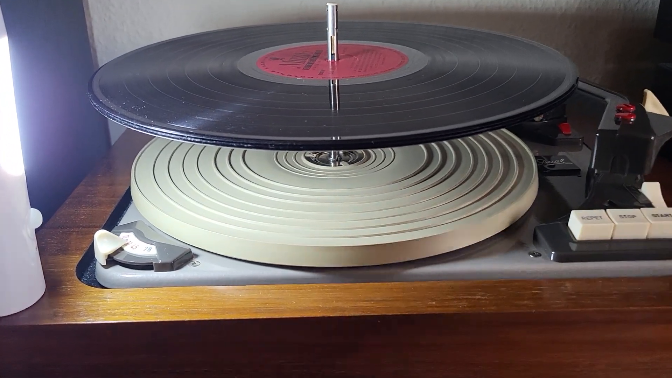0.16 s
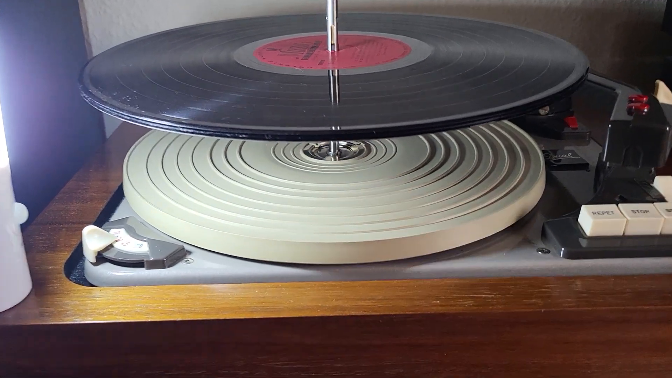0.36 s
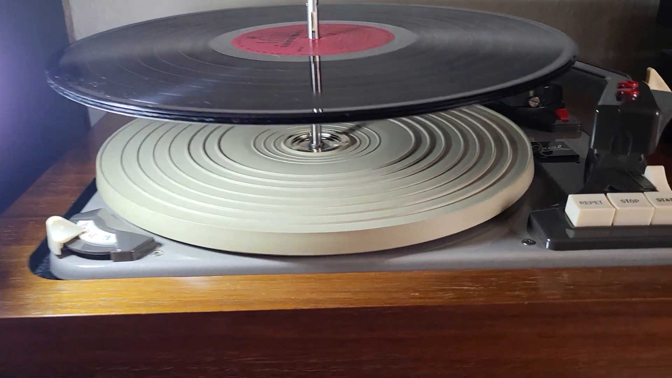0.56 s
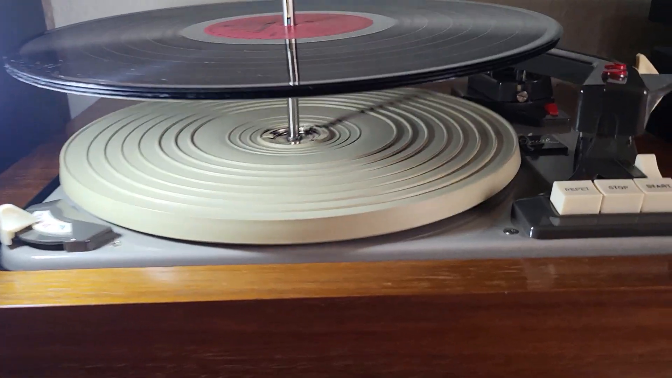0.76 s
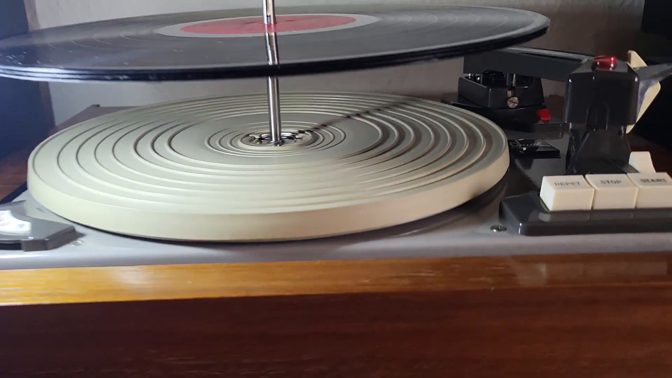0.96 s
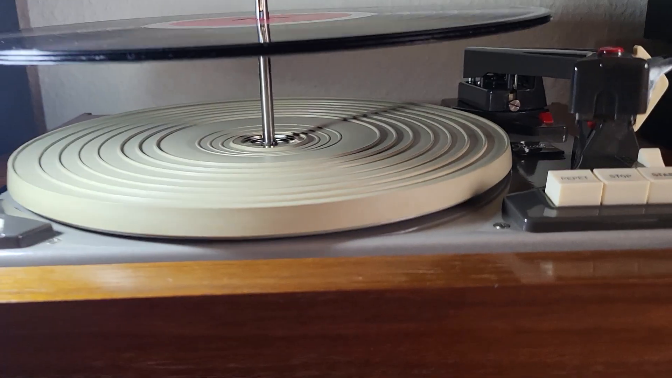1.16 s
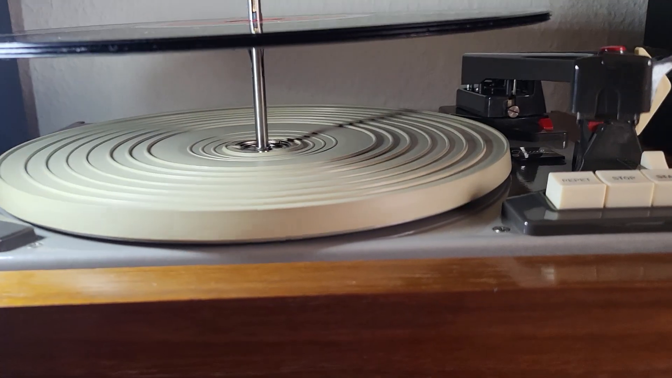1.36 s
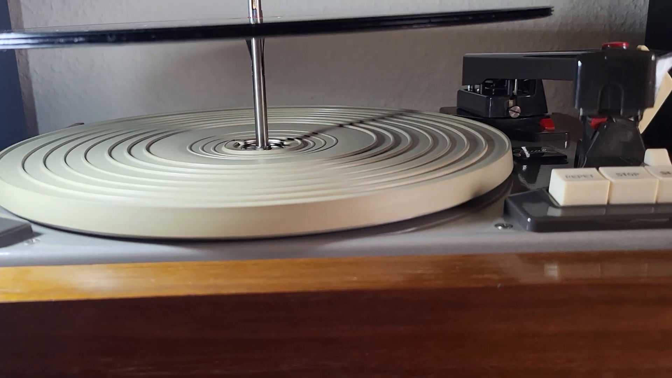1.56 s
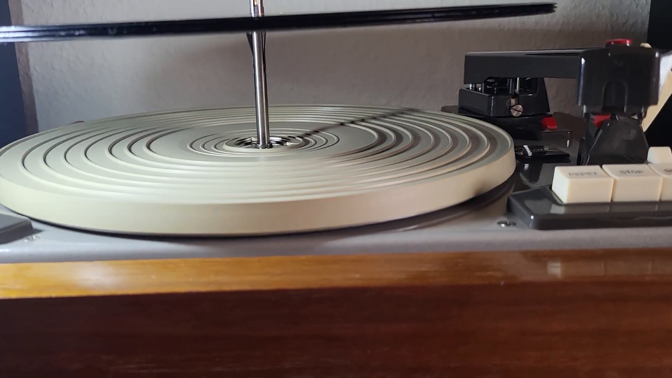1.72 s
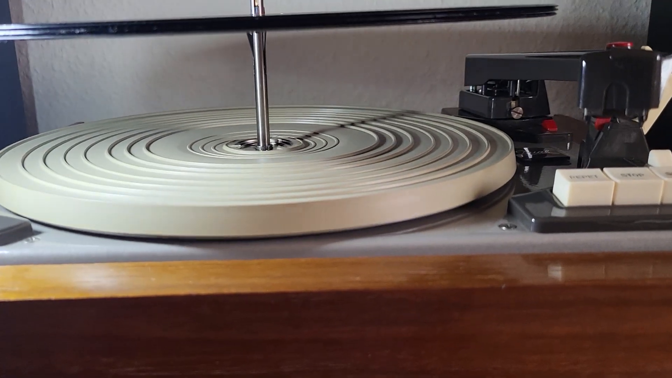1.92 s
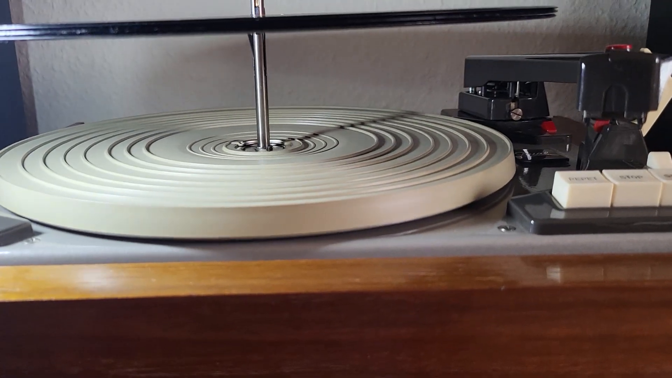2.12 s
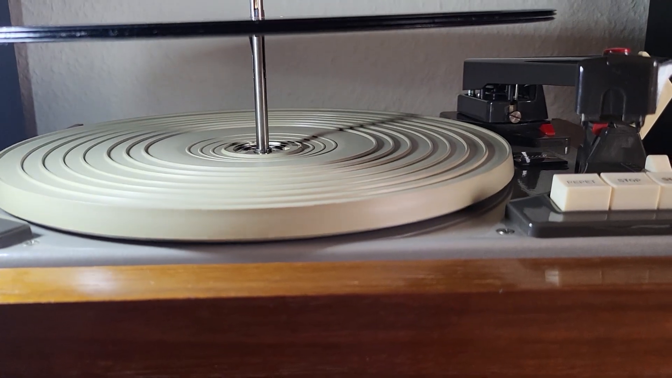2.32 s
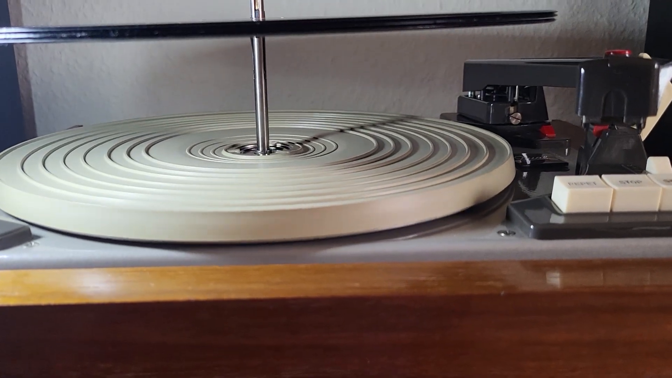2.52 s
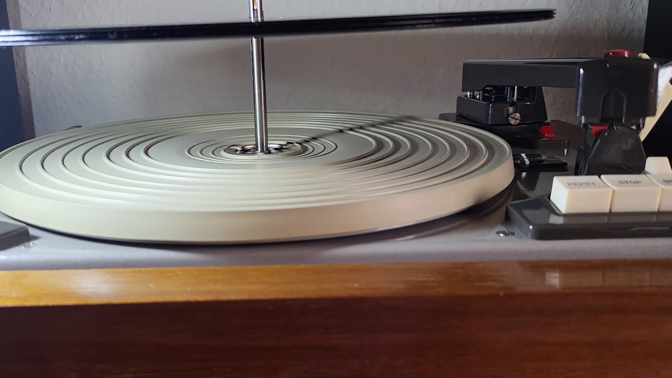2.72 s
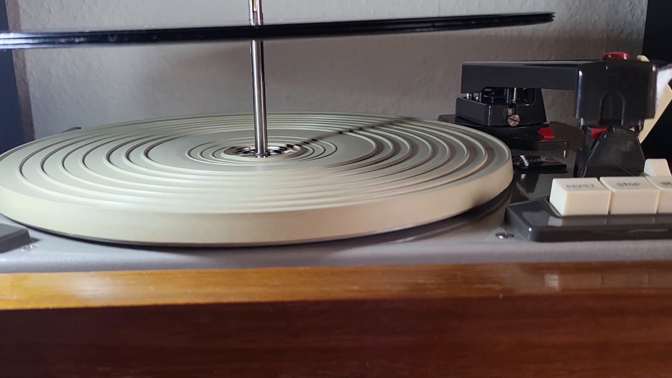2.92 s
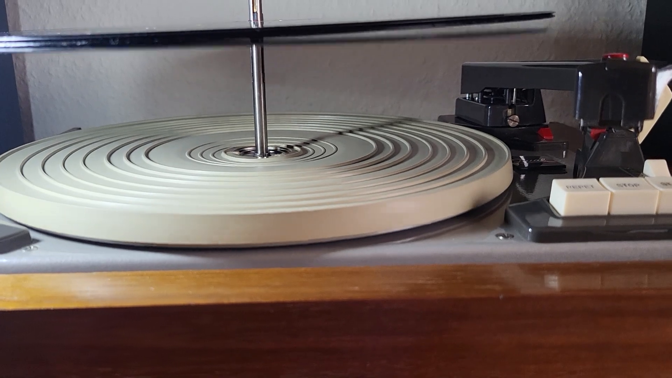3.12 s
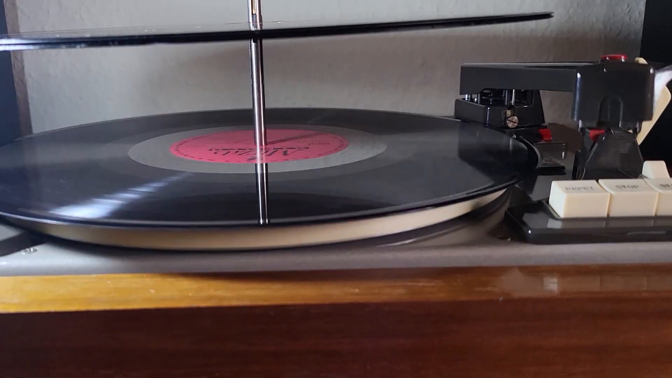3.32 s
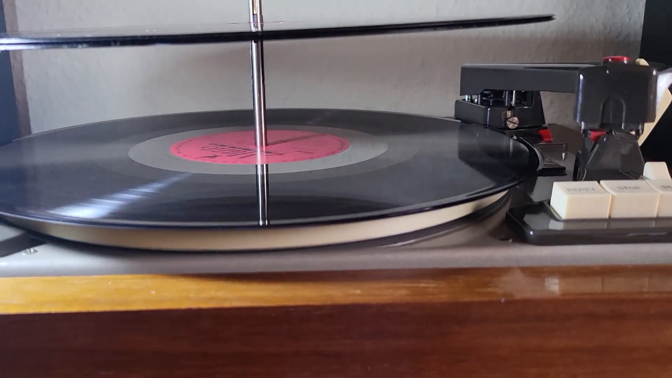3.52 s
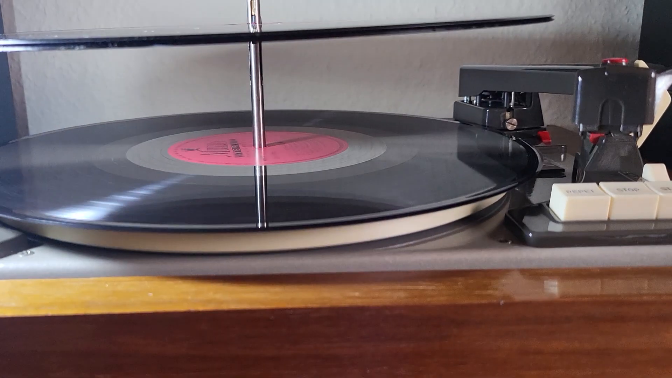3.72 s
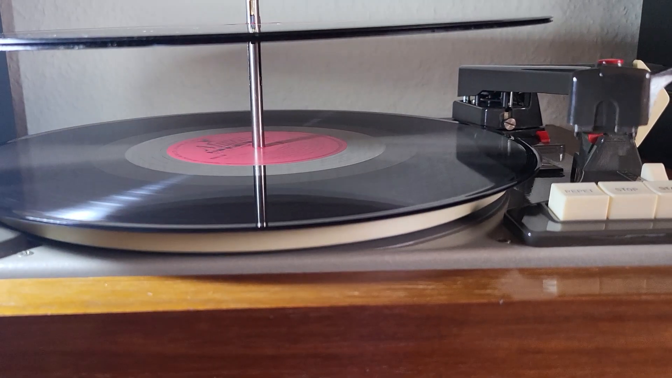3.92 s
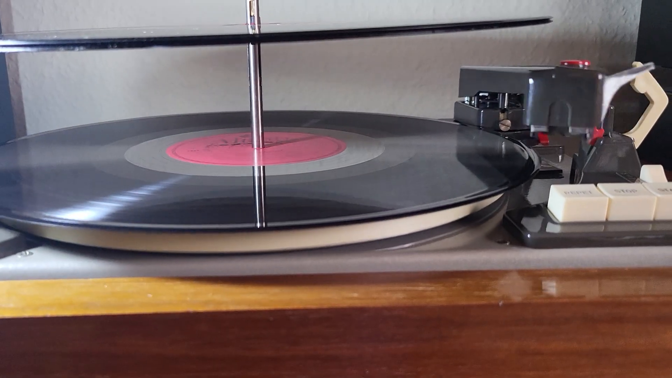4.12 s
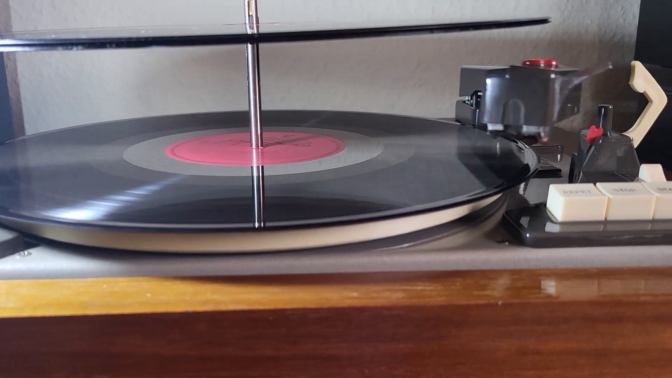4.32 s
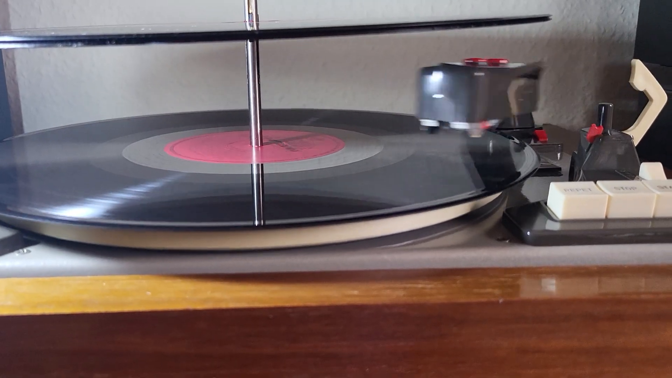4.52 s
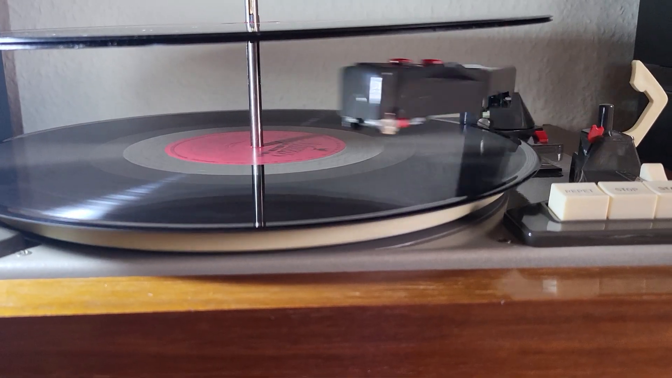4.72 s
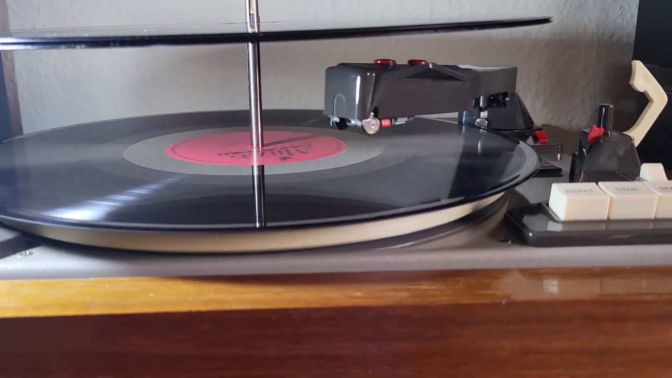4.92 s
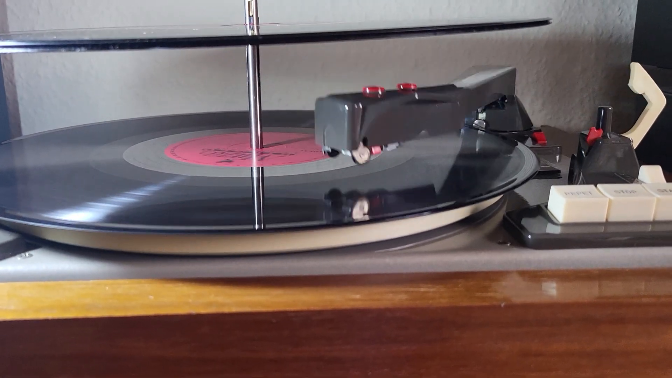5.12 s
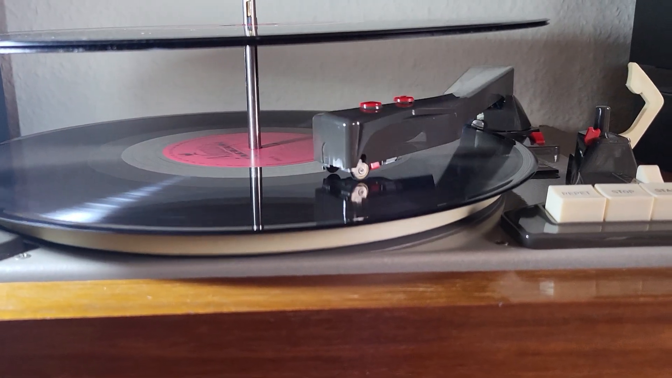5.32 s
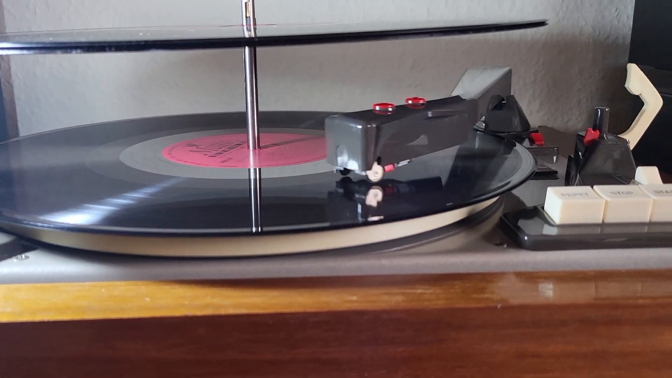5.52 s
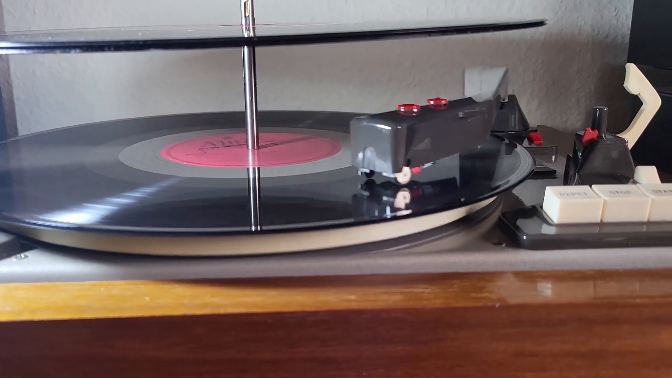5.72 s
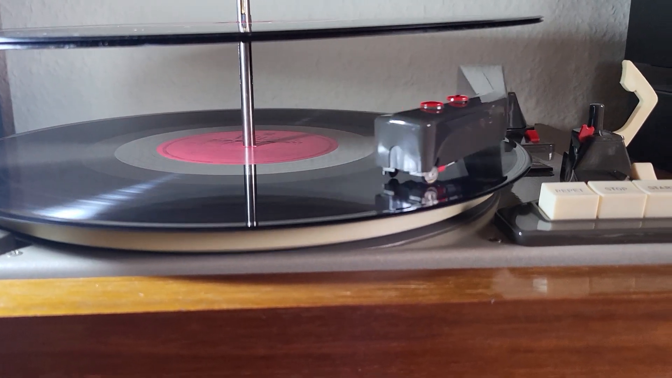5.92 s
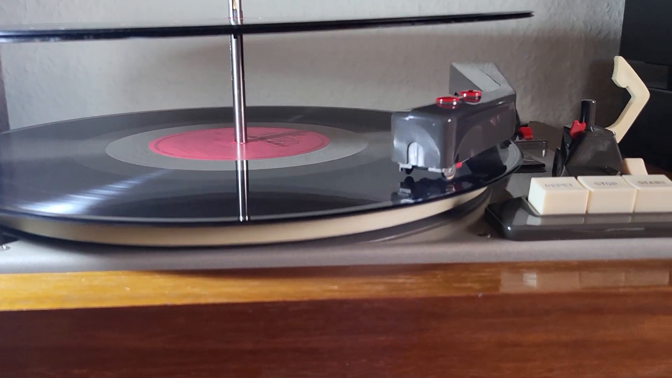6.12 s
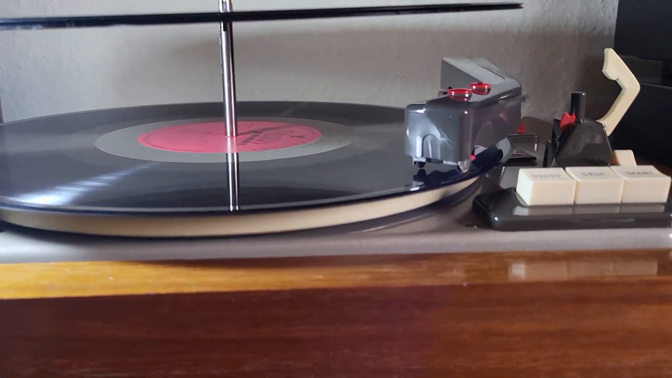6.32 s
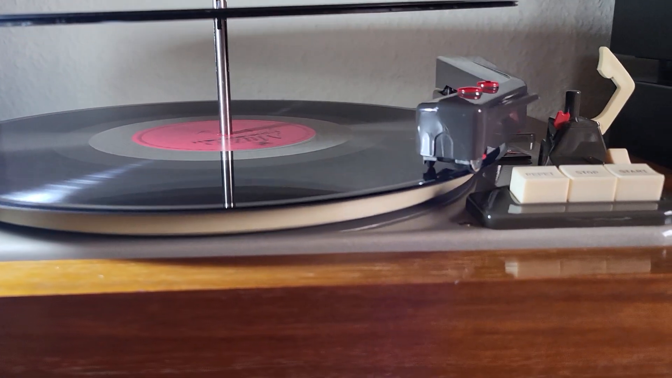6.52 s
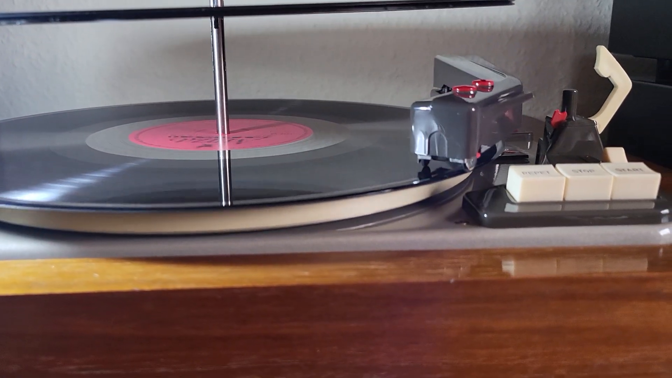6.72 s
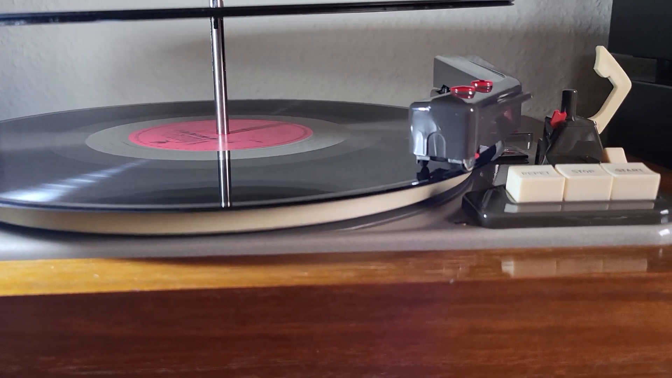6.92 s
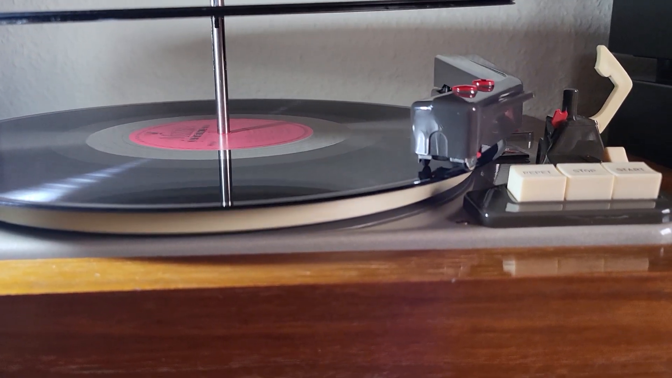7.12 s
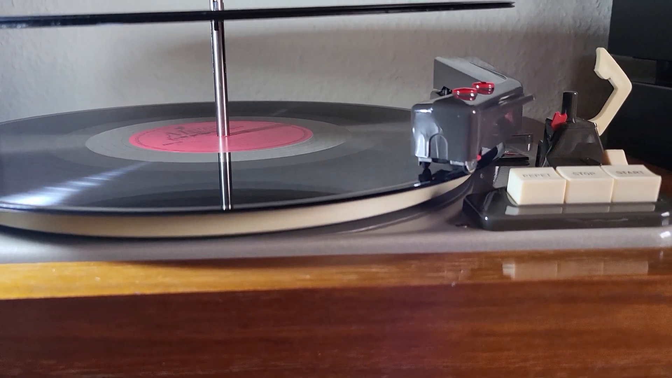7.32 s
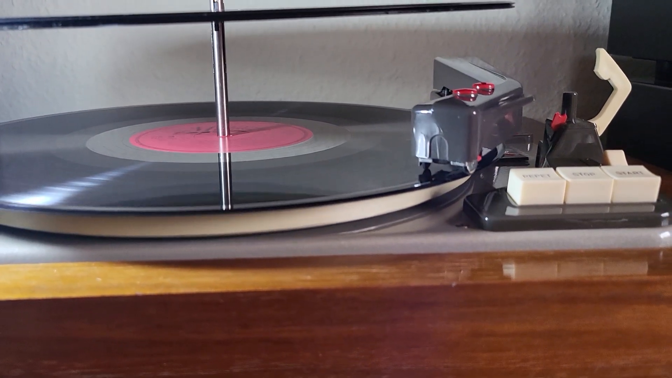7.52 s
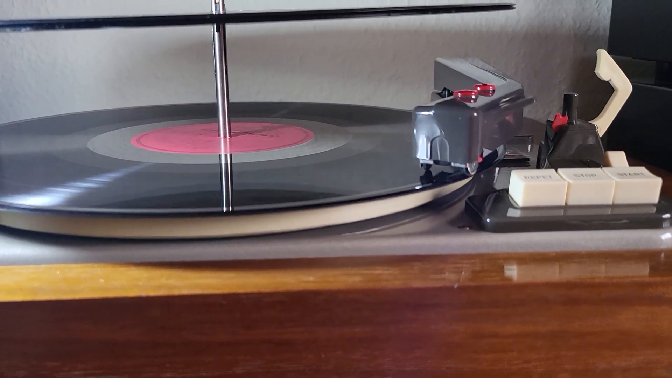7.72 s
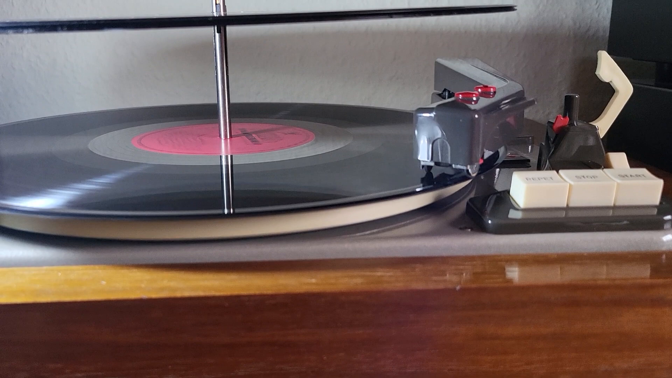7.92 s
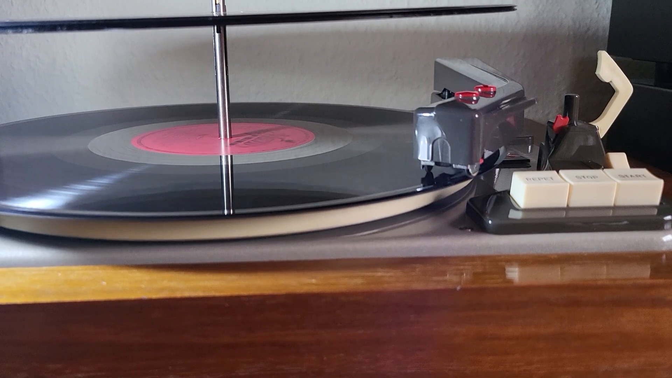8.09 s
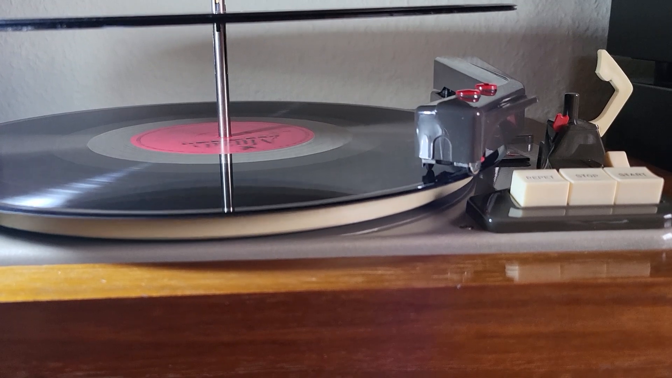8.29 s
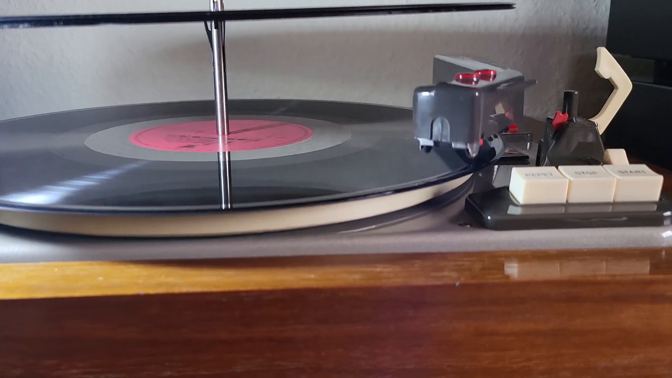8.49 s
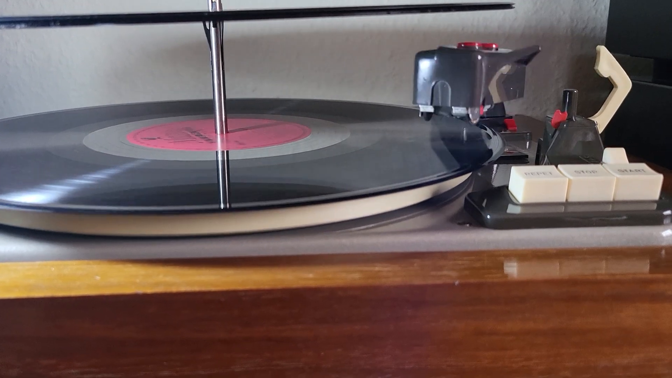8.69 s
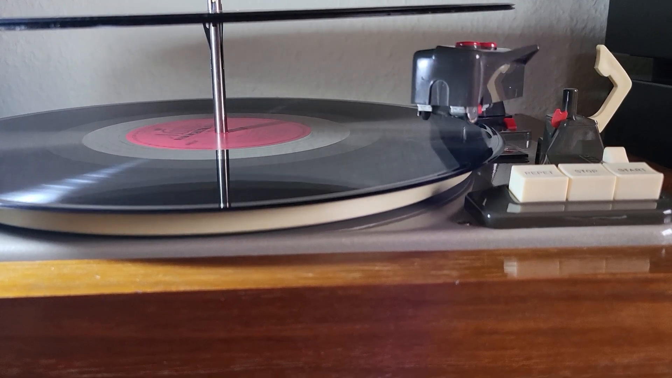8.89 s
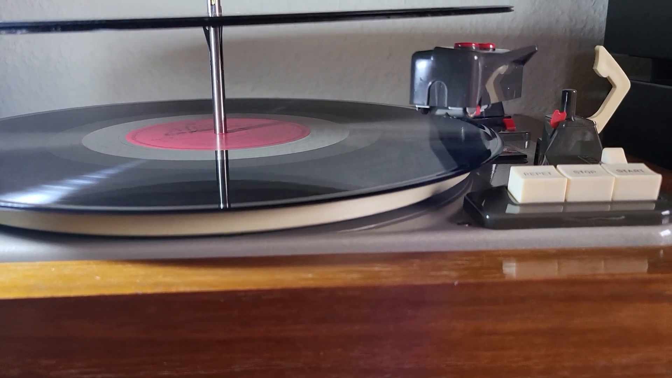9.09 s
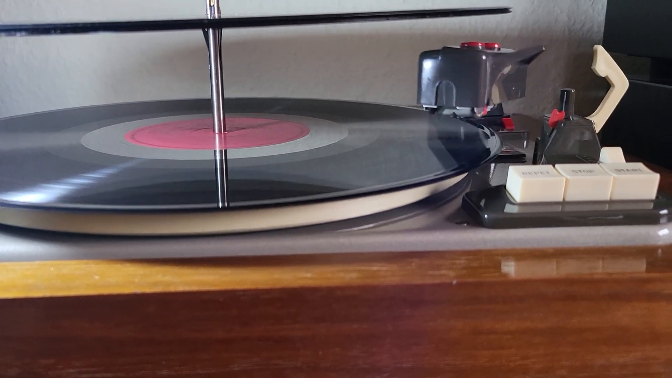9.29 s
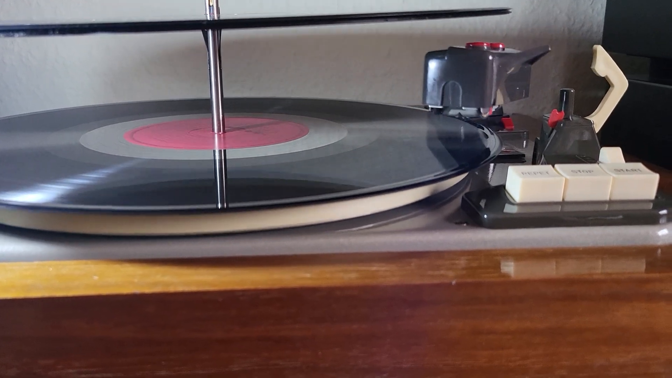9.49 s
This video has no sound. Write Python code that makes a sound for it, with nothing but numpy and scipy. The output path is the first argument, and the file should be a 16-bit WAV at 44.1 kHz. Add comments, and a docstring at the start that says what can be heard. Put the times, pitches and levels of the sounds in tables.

```python
"""An automatic record changer in a wooden base runs through its cycle, close by in a small room.
The motor hums throughout. A linkage rustles, the pawl (a small catch on the spindle) snaps, and a
record slides down and slaps onto the platter. The tone arm swings in, hits its stop and lands.
Its needle skips outward over the grooves, then sticks and slips along the rim. Last, the latch shuts.
Each blow or rub is noise, shaped by the tone colour and ringing of the part that makes it."""
import sys
import numpy as np
from scipy import signal
from scipy.fft import rfft, irfft, next_fast_len
from scipy.io import wavfile
from scipy.ndimage import uniform_filter1d, map_coordinates

SR = 44100
rng = np.random.default_rng(int(sys.argv[2]) if len(sys.argv) > 2 else 0)


def unload_audio(sound):
    """Save the sound as a 16-bit wav file, at the path given as the first command line argument."""
    columns = np.transpose(np.atleast_2d(sound))
    # keep every value between -1 and 1, then stretch to whole-number steps
    steps = np.round(np.clip(columns, -1, 1) * 32767)
    wavfile.write(sys.argv[1], SR, steps.astype(np.int16))


N = 421155

# the needle's friction on the rim: (time [s], hiss [dB], rumble [dB])
RIM_DRAG = [(6.569, -55.5, -63.5), (6.69, -55.5, -61), (6.9, -67, -59), (6.96, -62, -61),
            (8.32, -62, -65.5), (8.459, -70, -69)]
# ringing of the tone arm and needle holder: (pitch [Hz], width [Hz], level [dB])
ARM_MODES = [(1032, 18.7, 14.5), (2234, 13, 13), (3120, 200, -39), (3680, 115, 9.5), (5090, 175, 5.5),
             (5420, 80, -52), (6500, 150, -1), (8000, 600, 0), (8600, 64, -7)]


def amp(db):
    """Turn decibels into a gain."""
    return 10 ** (np.asarray(db) / 20)


def along(points, hz):
    """Read between (frequency [Hz], value) points on a logarithmic frequency axis."""
    freqs, values = np.transpose(points)
    return np.interp(np.log(hz + 1), np.log(freqs + 1), values)


def curves(rows, fade=0.1):
    """A gain per sample for each dB column; it fades to silence outside the listed times."""
    times, *columns = np.transpose(rows)
    t = np.arange(N) / SR
    gate = np.clip(1 + np.minimum(t - times[0], times[-1] - t) / fade, 0, 1) ** 2
    return [gate * amp(np.interp(t, times, db)) for db in columns]


def wobble(rate):
    """A smooth curve through `rate` random values a second."""
    return map_coordinates(rng.standard_normal(int(N * rate / SR) + 4), [np.arange(N) * rate / SR])


def grit(gain):
    """Two unrelated random forces of the given strength."""
    return gain * rng.standard_normal((2, len(gain)))


def burst(t, rise, t60):
    """A quick rise and a decay that loses 60 dB in t60 seconds."""
    return (1 - np.exp(-t / rise)) * amp(-60 * t / t60)


def add(track, s, sound):
    """Mix a sound into a track at s seconds."""
    start = round(s * SR)
    track[..., start:start + sound.shape[-1]] += sound[..., :track.shape[-1] - start]


def pan(db):
    """Channel gains that make the left db louder than the right."""
    return amp([[db / 2], [-db / 2]])


def filtered(x, response):
    """Multiply each frequency in x by response(hz)."""
    size = x.shape[-1]
    padded = next_fast_len(size + SR // 4, True)
    return irfft(rfft(x, padded) * response(np.fft.rfftfreq(padded, 1 / SR)), padded)[..., :size]


def patchy(x, depth_db, size):
    """Wandering tone colour: random gains over patches of time and pitch; a larger size is slower."""
    spectrum = signal.stft(x, SR, nperseg=size)[2]
    field = uniform_filter1d(rng.standard_normal(spectrum.shape[1:]), size=6, axis=0)
    field = uniform_filter1d(field, size=14, axis=1)
    return signal.istft(spectrum * amp(depth_db * field / field.std()), SR, nperseg=size)[1][:, :N]


def body(colour, modes=(), ring_db=0, size=8192):
    """A part's answer to one tap, at energy 1: a broad tone colour plus ringing pitches (modes)."""
    freqs = np.fft.rfftfreq(size, 1 / SR)
    power = amp(along(colour, freqs)) ** 2
    for hz, width, db in modes:
        power = power + (amp(db + ring_db) / (1 + ((freqs - hz) / width) ** 2)) ** 2
    # folding the cepstrum puts all the ringing after the tap
    cepstrum = irfft(np.log(power) / 2)
    cepstrum[1:size // 2] *= 2
    cepstrum[size // 2 + 1:] = 0
    response = irfft(np.exp(rfft(cepstrum)))
    return response / np.linalg.norm(response)


def radiate(force, response, lag_ms=0):
    """Send two forces through a part to both microphones; the left hears it lag_ms later."""
    likeness = [(60, 0.5), (300, 0.81), (640, 0.83), (1400, 0.38), (3000, .15), (8000, 0.27),
                (15000, 0.083)]  # how alike left and right are: (frequency [Hz], likeness [0 to 1])

    def mid_side_gains(hz):
        angle = np.arccos(np.clip(along(likeness, hz), -1, 1)) / 2
        return np.array([np.cos(angle), np.sin(angle)])

    pair = signal.oaconvolve(force, response[None], axes=1)[:, :force.shape[1]]
    mid, side = filtered(pair, mid_side_gains)
    left = filtered(mid + side, lambda hz: np.exp(-2j * np.pi * hz * lag_ms / 1000))
    return np.array([left, mid - side])


def rub(gain, colour, unsteady_db):
    """A soft, gritty sliding contact whose colour wanders as the pressure shifts."""
    roughness = amp(2 * wobble(200))
    return patchy(radiate(grit(gain * roughness), body(colour)), unsteady_db, size=1024)


def strikes(rows, response, rise, t60, lag_ms=0):
    """Each blow is a fast-dying clatter that rings the part, with its own amount of treble."""
    out, t = np.zeros((2, N)), np.arange(SR // 3) / SR
    for s, db, treble_db in rows:
        hit = radiate(grit(burst(t, rise, t60)), response, lag_ms)
        treble = filtered(hit, lambda hz: hz ** 2 / (hz ** 2 + 4000 ** 2))
        treble_gain = amp(treble_db) * (1.16 + 0.4 * np.exp(-t / 0.002))  # the highs die first
        add(out, s, amp(db) * (hit + (treble_gain - 1) * treble))
    return out


def room_tone():
    """Quiet, slightly restless background noise."""
    colour = [(25, -21), (70, 4.5), (130, -3), (230, -13), (400, -11.5), (500, -19.5), (850, -25.5),
              (2100, -21), (3900, -31.5), (6000, -35.5), (7900, -29.5), (10000, -38), (15000, -32.5)]  # background tone: (frequency [Hz], level [dB])
    return amp(-69) * radiate(grit(amp(1.2 * wobble(6.9))), body(colour))


def room_echo(x):
    """The echo from the walls builds up quickly; each frequency dies at its own speed."""
    decay = [(100, 0.18), (300, 0.29), (700, 0.37), (1900, 0.41), (5000, 0.39), (13000, 0.29)]  # echo length: (frequency [Hz], time to fall 60 dB [s])
    hz, t, noise = signal.stft(rng.standard_normal((2, SR // 2)), SR, nperseg=256)
    tail = signal.istft(noise * burst(t, 0.004, along(decay, hz)[:, None]), SR, nperseg=256)[1]
    walls = body([(60, 0.0), (500, 1.5), (2000, -2.5), (8000, -4.5), (15000, -3.5)])
    tail = radiate(tail / np.linalg.norm(tail[0]), walls)
    return signal.fftconvolve(x, tail, axes=1)[:, :N]


def motor():
    """The motor hums on two low, slightly wavering tones."""
    tones = [(48.4, -66.5), (199.2, -80)]  # hum: (pitch [Hz], level [dB])
    t = np.arange(N) / SR
    return sum(amp(db + 0.6 * wobble(3.8)) * np.sqrt(2) * np.sin(2 * np.pi * hz * t + .4 * wobble(12))
               for hz, db in tones)


def cam():
    """The cam, a shaped wheel that moves the levers, rubs in swells as it turns."""
    swells = [(-0.3, 0.52, -64.5), (0.652, 0.75, -88), (1.98, 0.48, -76.5), (3.8, 0.76, -80.5),
              (8.4, 0.95, -78.5)]  # harder rubbing: (start [s], length [s], level a long swell reaches [dB])
    colour = [(150, -16), (380, -6), (550, -14), (900, -17), (1500, -7.5), (2100, -0.5), (2550, -5.5),
              (3000, -18), (6000, -23.5), (8000, -27), (11000, -35.5)]  # tone of the rub: (frequency [Hz], level [dB])
    idle_db, fade_s = -86.5, 0.36
    t = np.arange(N) / SR
    pressure = amp(idle_db) + sum(amp(db) * np.clip(np.minimum(t - s, s + length - t) / fade_s, 0, 1)
                                  for s, length, db in swells)
    return pan(2) * rub(pressure, colour, unsteady_db=2.5)


def linkage():
    """The lifting linkage rustles as its parts rub."""
    friction = [(0.55, -73), (0.69, -70.5), (0.73, -56), (0.77, -68.5), (0.95, -69.5), (1.25, -73.5)]  # rubbing: (time [s], level [dB])
    colour = [(100, 6), (350, 7), (700, -15.5), (1100, -9.5), (1270, -2), (1450, -17), (5500, -20.5),
              (8000, -14.5), (10500, -22), (15000, -18.5)]  # its tone: (frequency [Hz], level [dB])
    return rub(curves(friction)[0], colour, unsteady_db=-1)


def arm_pivot():
    """The pivot rubs as the tone arm swings in."""
    friction = [(4.48, -80), (4.508, -67.5), (4.68, -63), (4.83, -58.5)]  # rubbing: (time [s], level [dB])
    colour = [(300, -6), (620, -6), (900, -16), (1700, -10), (1980, 14), (2380, 10.5), (2600, -2),
              (2900, 1), (3400, -13.5), (6500, -30), (8000, -25), (10000, -35)]  # its tone: (frequency [Hz], level [dB])
    return pan(2) * rub(curves(friction)[0], colour, unsteady_db=2)


def deck():
    """The deck sits on springs and takes blows as low, dull thuds."""
    pushes = [(0.574, -42.5), (0.889, -48), (2.699, -38.5), (3.332, -28.5), (3.349, -30), (5.277, -54),
              (5.368, -49), (8.415, -53)]  # pushes on the deck: (time [s], level [dB])
    colour = [(20, -23.5), (40, -3.5), (72, 4.5), (110, -9.5), (200, -18.5), (500, -51.5), (1500, -76)]  # its tone: (frequency [Hz], level [dB])
    force, t = np.zeros(N), np.arange(SR // 3) / SR
    for s, db in pushes:
        add(force, s, amp(db) * burst(t, rise=.002, t60=.14))
    return pan(-1.3) * radiate(grit(force), body(colour))


def lever_ticks():
    """Levers and tone arm tick as they touch."""
    hits = [(0.847, -43.5, -8.5), (0.949, -57, -14), (1.2, -52.5, -30), (3.227, -39.5, -17),
            (4.004, -56.5, -19), (4.136, -56, -17), (5.047, -43, 4.5), (5.277, -38.5, -17),
            (5.369, -28, -47), (8.344, -35, 3), (9.343, -56, 16)]  # small contacts: (time [s], level [dB], extra treble [dB])
    colour = [(150, -26.5), (500, -9), (800, -14), (1600, -10), (2150, -5.5), (3100, -15), (4500, -20),
              (7200, -22.5), (8100, -14), (9000, -19.5), (16000, -22.5)]  # their tone: (frequency [Hz], level [dB])
    return pan(0.91) * strikes(hits, body(colour), rise=0.003, t60=0.051)


def arm_stop():
    """The swinging arm meets its stop with a thin ping and rebounds."""
    hits = [(4.834, -36, -3), (4.865, -43, -6.5)]  # hit and rebound: (time [s], level [dB], extra treble [dB])
    colour = [(150, -28), (600, -5.5), (850, -13), (1100, -6), (1700, -4.5), (2200, -3.5), (3100, -2),
              (4500, -22), (7200, -21), (8100, -4), (9000, -19), (16000, -29)]  # the stop's tone: (frequency [Hz], level [dB])
    modes = [(8000, 190, -0.5)]  # its ping: (pitch [Hz], width [Hz], level [dB])
    return pan(1) * strikes(hits, body(colour, modes), rise=0.0012, t60=0.042)


def arm_jolts():
    """The arm is jolted on the rim and in its cradle: soft knocks, each with its own pitch."""
    knocks = [(5.062, -48.5, 590), (5.368, -51, 2230), (5.397, -47, 1000), (7.356, -42.5, 1810),
              (7.687, -40.5, 1990), (7.704, -40.5, 420), (7.773, -43, 340), (7.948, -47, 316),
              (8.295, -42, 910), (8.415, -42, 330), (8.73, -58.5, 520), (9.345, -54, 504)]  # jolts: (time [s], level [dB], pitch [Hz])
    shape = [(.3, 2.5), (.75, -3), (1, 11.5), (1.4, 0.5), (3, -5), (6, -18.5), (12, -37)]  # their tone: (frequency [multiple of the pitch], level [dB])
    out, t = np.zeros((2, N)), np.arange(SR // 4) / SR
    for s, db, hz in knocks:
        colour = [(hz * multiple, level) for multiple, level in shape]
        add(out, s, amp(db) * radiate(grit(burst(t, rise=0.0033, t60=0.076)), body(colour)))
    return out


def slips(rows, length, grain_db):
    """The friction force of short slips, each a swell of fine grains."""
    force, t = np.zeros(N), np.arange(SR // 8) / SR
    age = 2 * t / length  # 1 at the top of the swell
    for s, db in rows:
        add(force, s - .003, amp(db) * age ** 2 * np.exp(2 - 2 * age))
    return grit(force * amp(grain_db * wobble(900)))


def groove_skips(count):
    """Skips come ever faster as the arm gathers speed, swelling then easing: (time [s], level [dB])."""
    start_s, first_gap_s, shrink_s = 5.597, 0.0708, 0.00144
    peak_s, peak_db, fall_db_per_s = 6.2, -55.5, 16.5
    k = np.arange(count)
    times = start_s + first_gap_s * k - shrink_s * k * (k - 1) / 2
    return list(zip(times, peak_db - fall_db_per_s * np.abs(times - peak_s)))


def needle_skating():
    """The needle bounces as it lands, then drags and skips outward across the grooves."""
    bounces = [(5.33, -48), (5.449, -47), (5.472, -50.5), (5.503, -58), (5.54, -51)]  # landing bounces: (time [s], level [dB])
    friction = [(5.3, -69.5), (5.414, -66.5), (6.55, -64)]  # drag over the grooves: (time [s], level [dB])
    drag_colour = [(60, -5.5), (170, -4), (330, 9.5), (450, -6), (600, 2.5), (780, -21), (1080, 7),
                   (1280, 0), (1660, 4.5), (3800, -9), (4430, -27), (5400, -7.5), (10000, -30),
                   (16000, -32)]  # tone of the drag: (frequency [Hz], level [dB])
    skip_colour = [(300, -35), (1100, 1), (2500, -1), (3700, 5.5), (4600, -19), (5700, -5), (7500, -11),
                   (9500, -19.5), (15000, -27)]  # tone of a skip: (frequency [Hz], level [dB])
    drag_force = grit(curves(friction)[0] * amp(3.8 * wobble(70)))
    drag = radiate(drag_force, body(drag_colour, ARM_MODES, ring_db=-9), lag_ms=-0.22)
    skip_force = slips(bounces + groove_skips(count=16), length=0.012, grain_db=2)
    skips = radiate(skip_force, body(skip_colour), lag_ms=-0.22)
    return pan(0.95) * (drag + skips)


def chatter(max_count):
    """Small, unevenly timed slips whose strength follows the drag on the rim: (time [s], level [dB])."""
    gap_s, scatter_gaps = 0.032, 0.4
    over_drag_db, scatter_db = 6.5, 3
    drag_times, drag_db, _ = np.transpose(RIM_DRAG)
    late, strong = rng.standard_normal((max_count, 2)).T
    times = drag_times[0] + gap_s * (np.arange(max_count) + 1 + scatter_gaps * late)
    db = np.interp(times, drag_times, drag_db) + over_drag_db + scatter_db * strong
    on_rim = times < drag_times[-1]
    return list(zip(times[on_rim], db[on_rim]))


def needle_on_rim():
    """Steady friction and sudden catches on the rim shake the needle holder, over a low rumble."""
    hard_catches = [(6.563, -35.5), (6.61, -41), (6.641, -42), (6.675, -44), (6.746, -37.5), (6.77, -45),
                    (6.786, -42), (6.823, -40), (6.865, -41.5), (6.899, -37), (7.044, -47.5), (7.177, -46),
                    (7.228, -43.5), (7.303, -44.5), (7.556, -51.5), (7.675, -45), (7.794, -46),
                    (7.888, -49.5), (7.927, -47), (8.241, -48), (8.452, -52.5)]  # the needle's hardest snags: (time [s], level [dB])
    scrape_colour = [(350, -27.5), (600, -2), (881, -14), (1080, 1), (1210, -3), (2180, 2), (2570, -8),
                     (3210, 3.5), (4520, -10), (5260, 0.5), (6200, -10), (8270, -6.5), (8990, -19.5),
                     (12800, -18), (16000, -21.5)]  # tone of the scrape: (frequency [Hz], level [dB])
    rumble_colour = [(60, -5), (120, -8), (200, 5), (260, -3.5), (345, 5), (460, -1.5), (560, 0),
                     (900, -18), (2000, -53)]  # tone of the rumble: (frequency [Hz], level [dB])
    hiss, shake = curves(RIM_DRAG, fade=0.0054)
    force = slips(hard_catches, length=0.015, grain_db=2)
    force += slips(chatter(max_count=90), length=0.013, grain_db=3.5)
    force += grit(hiss * amp(5.45 * wobble(90)))
    scrape = radiate(force, body(scrape_colour, ARM_MODES, ring_db=-7), lag_ms=-0.2)
    # the tip bites at a new angle each time, so every catch has its own colour
    scrape = patchy(scrape, depth_db=3, size=256)
    rumble = radiate(grit(shake * amp(2.3 * wobble(27))), body(rumble_colour))
    return scrape + rumble


def pawl():
    """The pawl on the spindle snaps over and rings briefly."""
    hits = [(2.697, -13, -5), (2.704, -16.5, 1)]  # the snap: (time [s], level [dB], extra treble [dB])
    colour = [(60, -25.5), (160, -23.5), (270, -10.5), (420, -9.5), (500, -5), (550, -5.5), (600, -11.5),
              (1080, -17), (1480, -19), (1900, -9.5), (2500, -17.5), (3400, -18.5), (8000, -26),
              (9500, -31), (13000, -27), (16000, -36)]  # the pawl's tone: (frequency [Hz], level [dB])
    modes = [(532, 83, -14.5), (1080, 61, -3), (1700, 33, 3), (1940, 88, -0.5), (2090, 24, -4),
             (2765, 49, -3), (2730, 48, -16)]  # its ringing: (pitch [Hz], width [Hz], level [dB])
    return strikes(hits, body(colour, modes, ring_db=-11), rise=0.0019, t60=0.061)


def latch():
    """The latch touches, then slams home with a bright ring."""
    hits = [(8.997, -24, -2.5), (9.015, -12.5, -0.5), (9.018, -12, 7.5), (9.024, -16, -10)]  # contacts: (time [s], level [dB], extra treble [dB])
    colour = [(88, -50.5), (150, -27), (410, -20), (560, -9.5), (730, -22.5), (1080, -12), (1190, -15),
              (2020, -4.5), (3040, -9), (5250, -11), (6770, -11.5), (8230, -8.5), (16000, -19)]  # the latch's tone: (frequency [Hz], level [dB])
    modes = [(2024, 52, -3.5), (4770, 53, -13.5), (5250, 140, 3), (5740, 100, 5.5), (7980, 76, 10.5),
             (10420, 47, -24.5)]  # its ringing: (pitch [Hz], width [Hz], level [dB])
    response = body(colour, modes, ring_db=-9)
    return pan(0.0066) * strikes(hits, response, rise=0.0033, t60=0.039, lag_ms=-0.039)


def falling_record():
    """The record slides down the spindle, slaps the platter and flaps."""
    friction = [(3.225, -48.5), (3.32, -57)]  # rub on the spindle: (time [s], level [dB])
    slide_colour = [(100, -19), (198, 1.5), (270, -21.5), (440, -10.5), (580, -24), (770, -10), (1400, -32),
                    (1950, -23.5), (2600, -36.5), (15000, -35)]  # its tone: (frequency [Hz], level [dB])
    hits = [(3.331, -15, 1), (3.347, -9.5, -0.5), (3.364, -20, -1.5), (3.374, -23, -3.5)]  # slaps: (time [s], level [dB], extra treble [dB])
    disc_colour = [(60, -24.5), (100, -12.5), (244, -17.5), (700, -16), (950, -22), (1110, -0.5),
                   (1350, -8), (1500, -9), (1800, -8), (2150, -13), (3250, -21), (8100, -18.5),
                   (8900, -28.5), (16000, -34)]  # the disc's tone: (frequency [Hz], level [dB])
    modes = [(1075, 73, 0.5), (1362, 35, -8), (2000, 130, -3), (3000, 190, -13.5), (3660, 73, -18),
             (5330, 180, -20), (7980, 390, -11.5)]  # its ringing: (pitch [Hz], width [Hz], level [dB])
    disc = body(disc_colour, modes, ring_db=-5)
    slaps = pan(-0.76) * strikes(hits, disc, rise=0.00023, t60=0.053, lag_ms=.22)
    slide = radiate(grit(curves(friction, fade=.005)[0]), body(slide_colour))
    return slide + slaps


def scene():
    """All parts of the machine in the room; the blows and the scraping get an echo."""
    blows = pawl() + falling_record() + latch() + lever_ticks() + arm_stop() + deck()
    scraping = needle_skating() + needle_on_rim() + arm_jolts()
    echo = room_echo(amp(-9) * blows + amp(-10.5) * scraping)
    background = motor() + cam() + arm_pivot() + linkage() + room_tone()
    return background + echo + scraping + blows


def record(dry):
    """The two microphone openings colour the sound differently; the very top treble is cut."""
    balance = [(60, 6.5), (380, 2.5), (1290, 3.5), (2380, 12.5), (3200, -0.5), (4400, -1.5), (15000, 0.5)]  # the left opening resonates: (frequency [Hz], left minus right [dB])
    top_hz = 16050
    coloured = filtered(dry, lambda hz: amp(np.outer([.5, -.5], along(balance, hz))))
    return filtered(coloured, lambda hz: 1 / (1 + (hz / top_hz) ** 120))


dry = scene()
out = record(dry)
unload_audio(out)
```